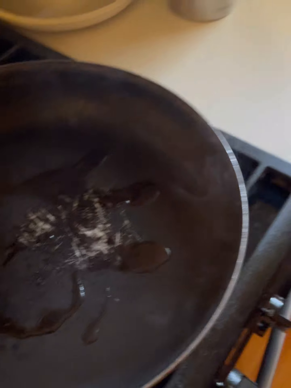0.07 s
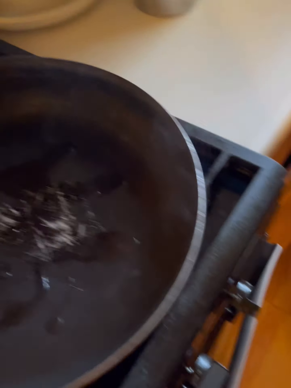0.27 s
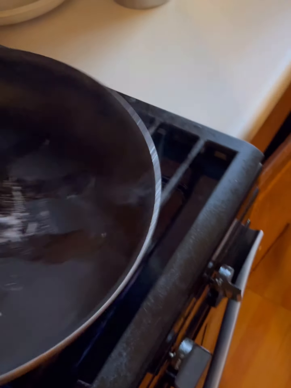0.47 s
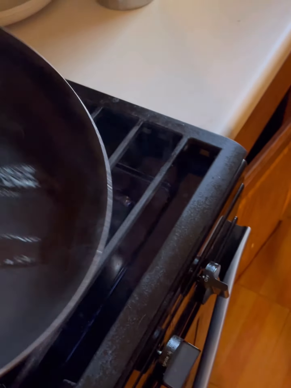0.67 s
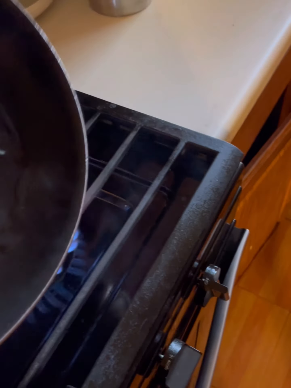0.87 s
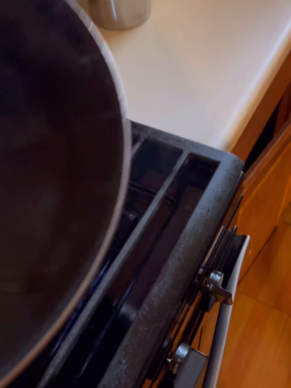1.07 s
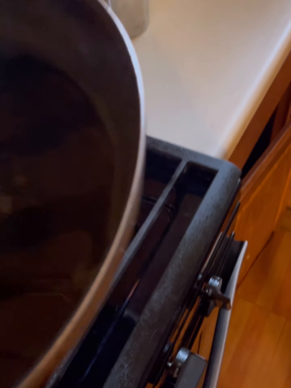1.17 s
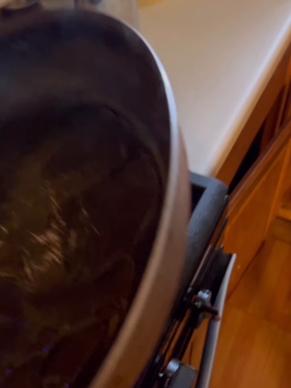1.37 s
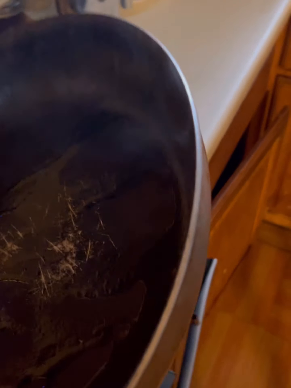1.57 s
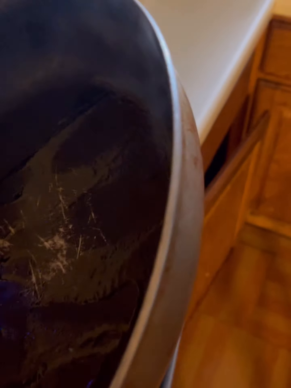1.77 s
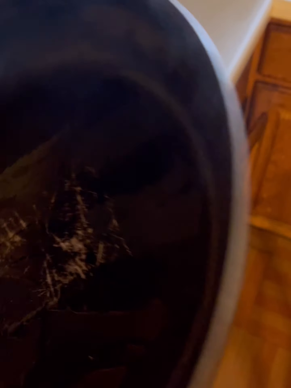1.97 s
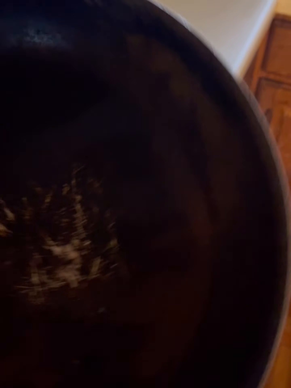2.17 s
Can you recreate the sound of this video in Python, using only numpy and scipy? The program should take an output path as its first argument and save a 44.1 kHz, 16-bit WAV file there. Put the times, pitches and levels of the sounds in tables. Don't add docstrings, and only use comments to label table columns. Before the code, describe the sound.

Skillet knocks against a cast-iron stove grate with bright scraping ticks, then a louder ringing clank

```python
import sys
import numpy as np
from scipy import signal
from scipy.fft import rfft, irfft
from scipy.io import wavfile
from scipy.ndimage import uniform_filter1d

SR = 44100
rng = np.random.default_rng(int(sys.argv[2]) if len(sys.argv) > 2 else 0)


def master(y):
    cut = np.clip(np.atleast_2d(y).T, -1, 1)
    pcm = np.round(cut * 32767)
    wavfile.write(sys.argv[1], SR, pcm.astype(np.int16))


def how_loud(loudness_db):
    steps = np.asarray(loudness_db, float) / 20
    return 10 ** steps


N = 97020

# frequency in Hz, level in dB.
HUM_COLOUR = [(25, -5.5), (90, 0), (330, -3.5), (900, -11), (2500, -25), (7000, -28.5), (10500, -23),
              (12800, -39.5)]
# frequency in Hz, width in Hz, lift (or
# cut, if negative) in dB.
HUM_RESONANCES = [(96, 23.5, 8), (269.4, 11, 1), (349, 48, 8), (524.7, 13.6, 11), (2396, 450, 8.5),
                  (4690, 730, 6.5), (8700, 600, 7), (13200, 820, -27)]
HUM_DB, PATCH_DB = -49, .6

# time in seconds, level in dB.
DRAG_LEVEL = [(0, -53), (0.102, -58.5), (.2, -57), (.21, -103)]
# frequency in Hz, level in dB.
DRAG_COLOUR = [(200, -38), (600, 5.5), (1200, -6.5), (2200, -15), (3800, -12.5), (6500, -23),
               (10500, -11.5), (13500, -41)]

# start in seconds, peak in dB, chatter t60 in seconds.
SKID_1_TICKS = [
    (.2114, -27, .02),
    (.2135, -32, .02),
    (.2175, -36, .02),
    (.2215, -37, .03),
    (.2275, -38, .05),
]
# start in seconds, peak in dB, chatter t60 in seconds.
SKID_2_TICKS = [
    (.3325, -52, .02),
    (.3364, -25, .02),
    (.3382, -25, .03),
    (.3425, -27, .02),
    (.3452, -30, .04),
    (.3527, -19.5, .012),
    (.3555, -25, .01),
    (.3595, -24, .015),
    (.3628, -32, .02),
    (.3665, -34, .04),
]
RIM_HZ = [3570, 4475, 5317, 5560, 5825, 6660, 7480, 7850, 8571, 9200, 10000, 10290, 11240, 11934]
# level in dB, t60 in seconds.
RIM_SKID_1 = [(-26, .03), (-14, .04), (-26, .1), (-9, .015), (-24, .05), (-20, .03), (-8, .02), (3, .018),
              (-14, .1), (-1, .016), (-18, .02), (-18, .03), (-12, .06), (-12, .02)]
# level in dB, t60 in seconds.
RIM_SKID_2 = [(-28, .03), (-3, .04), (-22, .18), (-8, .018), (-26, .1), (-19, .03), (-14, .04), (-14, .02),
              (-4, .09), (-4, .03), (1, .025), (-1, .03), (-3, .022), (-11, .03)]
TICK_S, CHATTER = .0003, 0.42
LIGHT_HZ = 3500
# frequency in Hz, level in dB.
BAR_COLOUR = [(1000, -20), (2200, -12), (4600, -12.5), (6400, -15), (8000, -1.5), (10200, -11),
              (12300, -20), (15000, 15.5)]
BAR_DB, BAR_SPREAD_DB = -4, 4
BAR_T60 = (.008, .16)

# start in seconds, ring in dB, knock in dB, boom in dB, thump in Hz.
DROPS = [
    (0.2257, -30.5, -26, -41.5, 92),
    (0.3378, -37.5, -61, -86, 89.3),
    (.382, -21.5, -20, -33.5, 73.9),
]
# delay in seconds, level in dB.
TOUCHES = [
    (0, -6.5),
    (.0008, -5.5),
    (.0024, 3.5),
    (.004, -2),
]
TOUCH_S = 0.00032
# frequency in Hz, level in dB, t60 in seconds.
GRATE_MODES = [(330, -19, 0.017), (560, -15.5, 0.046), (926, -6, 0.071), (1228, 7, 0.0059),
               (1436, 8.5, 0.014), (2065, 1, 0.012), (3095, -11, 0.016), (3730, -17, 0.063)]
PAN_HZ = [394, 444, 738, 757, 1104, 1147, 1722, 2142, 2392, 2676, 3010, 3155, 3564, 3980]
# level in dB, t60 in seconds.
PAN_DROP_1 = [(-19, .3), (0.5, 0.58), (-13, 0.25), (-15.5, 0.94), (-5, 0.13), (-21, 0.33), (-2.5, 0.16),
              (-4.5, 0.049), (-8, 2.2), (-14, 0.11), (-41, 0.027), (-14, .1), (-19, 0.059), (-8, 0.065)]
# level in dB, t60 in seconds.
PAN_GRAZE = [(-30, .2), (-20, .2), (0, .3), (-4, .3), (-9, .2), (-12, .2), (-8, .2), (-5, .2), (-2, .2),
             (-2, .2), (-4, .2), (-5, .2), (-14, .2), (-4, .2)]
# level in dB, t60 in seconds.
PAN_DROP_2 = [(-7.5, 2.7), (-4.5, 2.6), (-21, 3.6), (-17.5, 0.91), (-28, 0.55), (-19, 1.25), (-9, 0.57),
              (-12, 0.45), (-10, 0.56), (-6, 0.28), (-11.5, 0.2), (-6.5, .22), (-16, 0.28), (-7, 0.13)]
PAN_TWINS = {394: (2.8, -2, 1), 1722: (3, -3, 1.2), 2142: (3.6, -4, 1.3), 2676: (5.5, -13, 7),
             3010: (3, -7, 1.8), 3155: (3, -9, 2)}
GRIP_LOSS = [900, 150, 220]
RING_RISE_S = .003

# frequency in Hz, level in dB.
PANEL_COLOUR = [(40, -16), (80, 11), (150, 4), (200, -4.5), (320, 5), (420, -4.5), (800, -10.5),
                (2500, -62)]
# frequency in Hz, level in dB, t60 in seconds.
PANEL_MODES = [(150.5, -6.5, 1.47), (251, -9, 2.62), (310.3, -2.5, 0.87), (339.7, -7.5, 2.6)]
PANEL_RISE_S, PANEL_T60 = 0.015, 1.45
THUMP_DB, THUMP_RISE_S, THUMP_T60 = 17.5, 0.022, 0.17

# frequency in Hz, t60 in seconds.
KITCHEN_T60 = [(100, 0.8), (400, 1), (1100, 0.44), (3000, 0.57), (8000, 0.28), (13000, 0.23)]
# frequency in Hz, level in dB.
KITCHEN_SEND = [(500, -22), (1000, -12), (3000, -5), (9000, -3), (12600, -2), (13300, -30)]
RING_WET_DB = -6
# frequency in Hz, likeness from 0 to
STEREO_LIKENESS = [(100, 1), (600, .85), (1100, .45), (1800, .9), (3100, .08), (6000, .9), (7400, .85),
                   (8500, 1)]
# frequency in Hz, left minus right in dB.
DIRECT_TILT = [(100, 0), (400, 2.5), (750, 5), (1200, 0), (2300, -2), (3000, 5), (4900, -8), (6500, 0)]
# frequency in Hz, left's lead in
STEREO_PHASE = [(1400, 0), (2600, 1.3), (3700, .3), (4950, 3.2), (5750, 6.1), (8600, 9.4), (9450, 9.45),
                (10100, 10.5), (11900, 12.3)]
# frequency in Hz, level in dB.
MIC_RESPONSE = [(30, -10), (60, 0), (12300, 0), (12900, -7), (13500, -19), (15000, -30), (15200, -60)]


def evened(x):
    return x / np.sqrt(np.mean(x ** 2) + 1e-20)


def read(points, hz):
    f, value = np.transpose(points)
    return np.interp(np.log(hz + 1), np.log(f + 1), value)


def add(mix, s, sound):
    part = mix[round(s * SR):][:len(sound)]
    part += sound[:len(part)]


def coloured(x, gain):
    return irfft(rfft(x) * gain(np.fft.rfftfreq(x.shape[-1], 1 / SR)), x.shape[-1])


def pair(a, b):
    same = lambda hz: np.clip(read(STEREO_LIKENESS, hz), 0, 1)
    unlike = lambda hz: np.sqrt(1 - same(hz) ** 2)
    return np.array([a, coloured(a, same) + coloured(b, unlike)])


def ring(modes):
    t = np.arange(SR * 3 // 4) / SR
    total = np.zeros(len(t))
    for k, (hz, db, t60) in enumerate(modes):
        decay = how_loud(db - 60 * t / np.clip(t60, .005, 2))
        total += (-1) ** k * decay * np.sin(2 * np.pi * hz * t)
    return total


def hum():
    frames, hz = N // 256 + 5, np.fft.rfftfreq(1024, 1 / SR)
    a, b, c, d, patches = rng.standard_normal((frames, 513, 5)).T
    patches = uniform_filter1d(patches, size=10, axis=0)
    patches = evened(uniform_filter1d(patches, size=14, axis=1))
    humps = sum(db * np.exp(-((hz - f) / width) ** 2) for f, width, db in HUM_RESONANCES)
    colour = (read(HUM_COLOUR, hz) + humps)[:, None]
    z = np.array([a + 1j * b, c + 1j * d]) * how_loud(colour + PATCH_DB * patches)
    noise = signal.istft(z, nperseg=1024, noverlap=768)[1][:, :N]
    return how_loud(HUM_DB) * pair(*evened(noise))


def slide():
    s, db = np.transpose(DRAG_LEVEL)
    friction = coloured(rng.standard_normal(N), lambda hz: how_loud(read(DRAG_COLOUR, hz)))
    return how_loud(np.interp(np.arange(N) / SR, s, db)) * evened(friction)


def bar_swarm(count=360):
    u, t = rng.random((count, 3)), np.arange(SR // 8)[:, None] / SR
    shortest, longest = BAR_T60
    hz = 1200 + 13300 * u[:, 0]
    t60 = shortest * (longest / shortest) ** u[:, 1]
    t60 = t60 * np.clip((14000 - hz) / 1500, .2, 1)
    db = BAR_DB + read(BAR_COLOUR, hz) + 2 * BAR_SPREAD_DB * (u[:, 2] - 1)
    db = db - 10 * np.log10(t60 / shortest)
    modes = how_loud(db - 60 * t / t60) * np.sin(2 * np.pi * hz * t)
    return (modes * (-1) ** np.arange(count)).sum(1)


def skid(ticks, modes):
    drive, t = np.zeros(N), np.arange(4000) / SR
    for s, db, t60 in ticks:
        contacts = rng.standard_normal(len(t)) * (rng.random(len(t)) < .15)
        chatter = CHATTER * contacts * how_loud(-60 * t / max(t60, .005))
        burst = rng.standard_normal(len(t)) * t * np.exp(-4 * t / TICK_S)
        add(drive, s, how_loud(db) * (chatter + burst / np.linalg.norm(burst)))
    drive = signal.lfilter(*signal.butter(2, LIGHT_HZ, "high", fs=SR), drive)
    rim = signal.fftconvolve(drive, ring(np.column_stack([RIM_HZ, modes])))[:N]
    return rim + signal.fftconvolve(drive, bar_swarm())[:N]


def grate_knock(s, knock_db):
    touches, t = np.zeros(N), np.arange(200) / SR
    touch = t * np.exp(-4 * t / TOUCH_S)
    for lag, db in TOUCHES:
        add(touches, s + lag, how_loud(db) * touch / touch.sum())
    return signal.fftconvolve(touches, how_loud(knock_db) * ring(GRATE_MODES))[:N]


def pan_ring(s, ring_db, modes, grip):
    out, pan = np.zeros(N), 0
    for k, (hz, (db, t60)) in enumerate(zip(PAN_HZ, modes)):
        beat, twin_db, share = PAN_TWINS.get(hz, (0, -99, 1))
        twin = ring([(hz + beat, db + twin_db, t60 * share)])
        pan = pan + (-1) ** k * (ring([(hz, db, t60)]) + twin)
    t = np.arange(len(pan)) / SR
    add(out, s, how_loud(ring_db - grip * t ** 2) * pan * np.minimum(t / RING_RISE_S, 1))
    return out


def stove_boom(s, boom_db, thump_hz):
    out, t = np.zeros(N), np.arange(2 * SR) / SR
    thump = np.sin(2 * np.pi * thump_hz * t) * np.minimum(t / THUMP_RISE_S, 1) ** 2
    thump = thump * how_loud(THUMP_DB - 60 * t / THUMP_T60)
    rumble = evened(coloured(rng.standard_normal(len(t)), lambda hz: how_loud(read(PANEL_COLOUR, hz))))
    panels = rumble * how_loud(-60 * t / PANEL_T60)
    for hz, db, t60 in PANEL_MODES:
        panels = panels + how_loud(db - 60 * t / t60) * np.sin(2 * np.pi * hz * t)
    add(out, s, how_loud(boom_db) * (thump + panels * np.minimum(t / PANEL_RISE_S, 1)))
    return out


def kitchen(x):
    taps = np.zeros((2, SR))
    at = np.arange(200, SR - 20, 20) + rng.integers(0, 20, (2, (SR - 201) // 20))
    np.put_along_axis(taps, at, rng.choice([-1., 1.], at.shape), 1)
    hz, t, z = signal.stft(taps, SR, nperseg=256)
    decay = how_loud(-60 * t / read(KITCHEN_T60, hz)[:, None])
    tail = signal.istft(z * decay, SR, nperseg=256)[1]
    tail = tail / np.linalg.norm(tail[0])
    return pair(*signal.fftconvolve(x[None], tail, axes=1)[:, :N])


def scene():
    clatter = slide() + skid(SKID_1_TICKS, RIM_SKID_1) + skid(SKID_2_TICKS, RIM_SKID_2)
    rings, booms = np.zeros(N), np.zeros(N)
    for row, modes, grip in zip(DROPS, (PAN_DROP_1, PAN_GRAZE, PAN_DROP_2), GRIP_LOSS):
        s, ring_db, knock_db, boom_db, thump_hz = row
        clatter += grate_knock(s, knock_db)
        rings += pan_ring(s, ring_db, modes, grip)
        booms += stove_boom(s, boom_db, thump_hz)
    close = clatter + rings + booms
    direct = [coloured(close, lambda hz: how_loud(side * read(DIRECT_TILT, hz))) for side in (.5, -.5)]
    send = coloured(clatter + how_loud(RING_WET_DB) * rings, lambda hz: how_loud(read(KITCHEN_SEND, hz)))
    return np.array(direct) + kitchen(send) + hum()


def low_pass(x):
    return signal.sosfilt(signal.butter(12, 15110, fs=SR, output="sos"), x)


def record(dry):
    ports = []
    for x, side in zip(dry, (.5, -.5)):
        response = lambda hz: how_loud(read(MIC_RESPONSE, hz)) * np.exp(1j * side * read(STEREO_PHASE, hz))
        ports.append(coloured(x, response))
    return low_pass(np.array(ports))


dry = scene()
out = record(dry)
master(out)
```